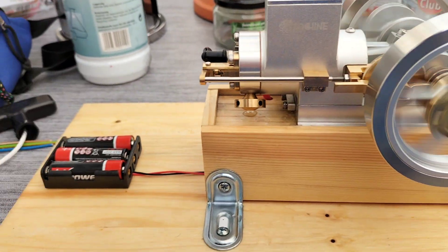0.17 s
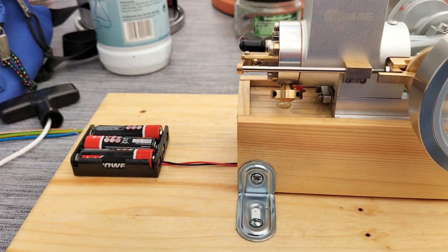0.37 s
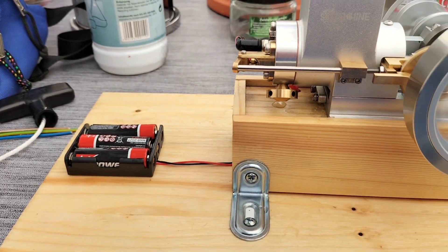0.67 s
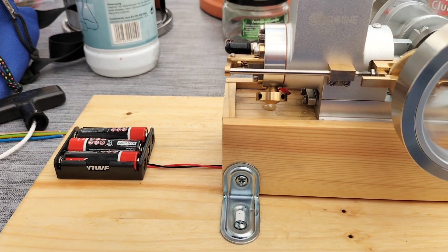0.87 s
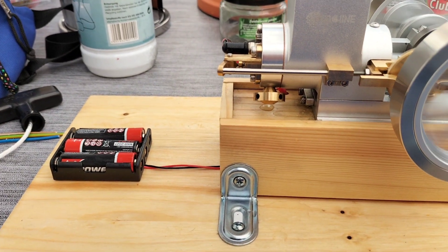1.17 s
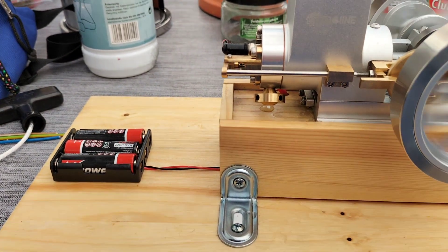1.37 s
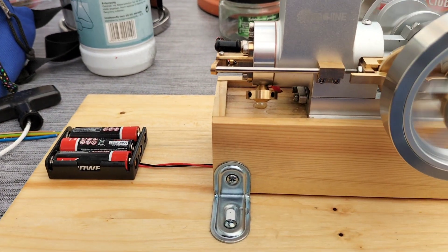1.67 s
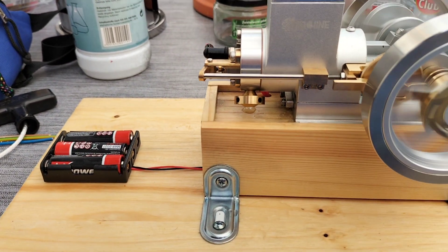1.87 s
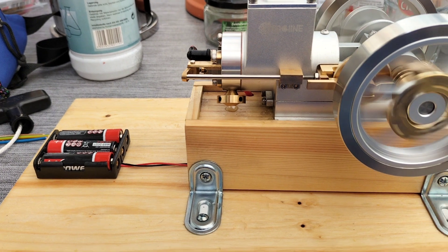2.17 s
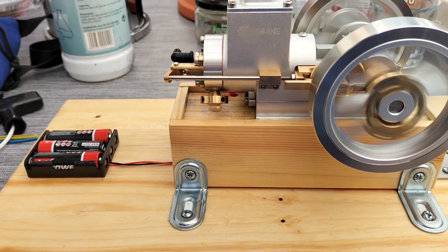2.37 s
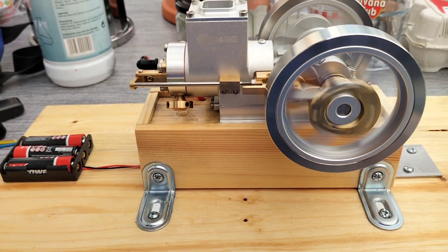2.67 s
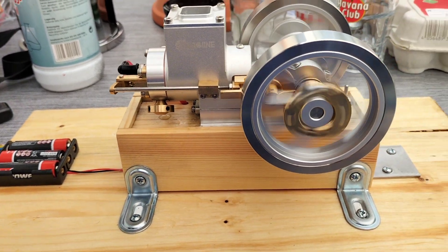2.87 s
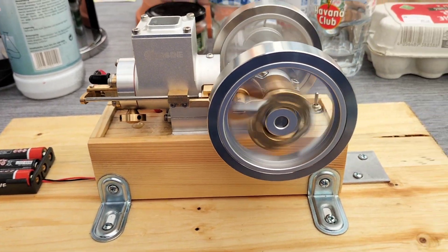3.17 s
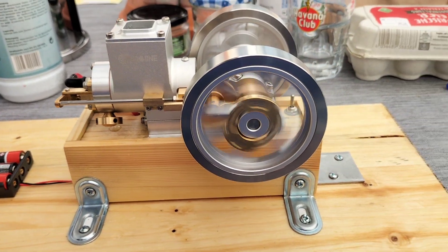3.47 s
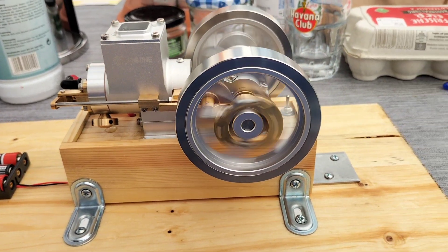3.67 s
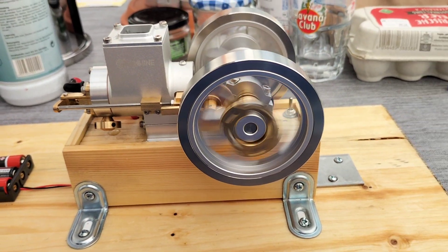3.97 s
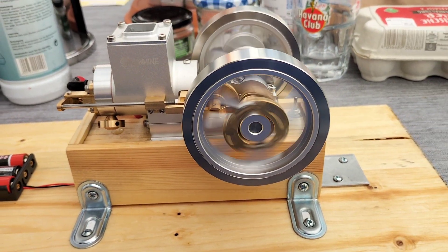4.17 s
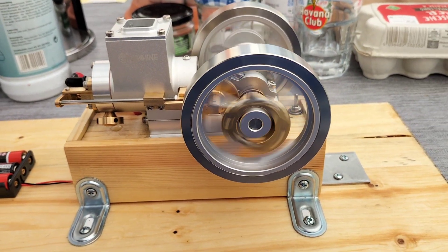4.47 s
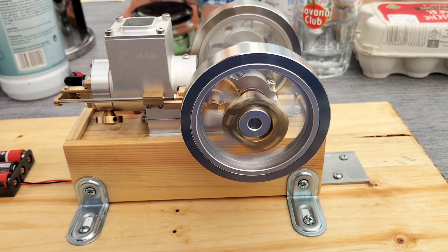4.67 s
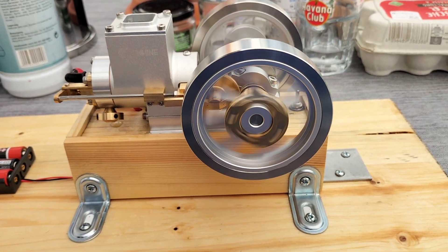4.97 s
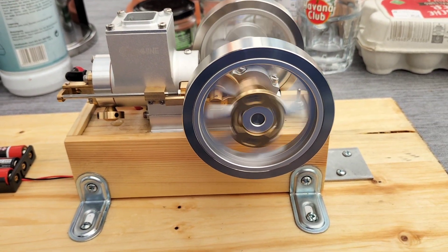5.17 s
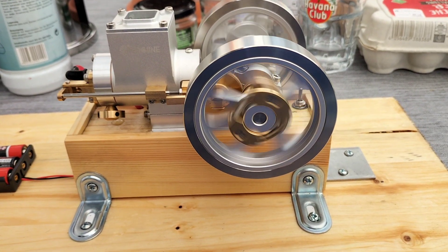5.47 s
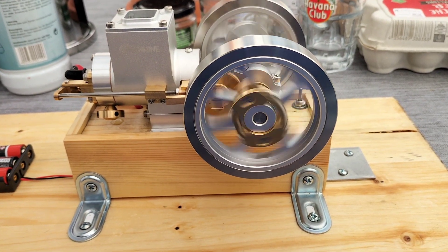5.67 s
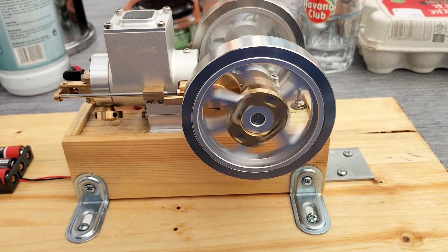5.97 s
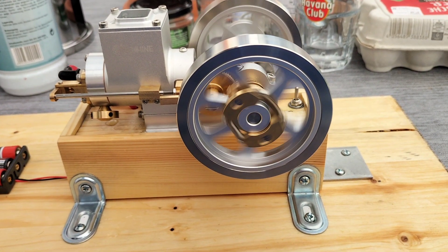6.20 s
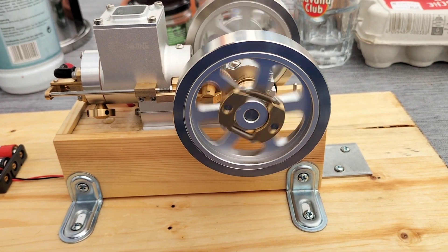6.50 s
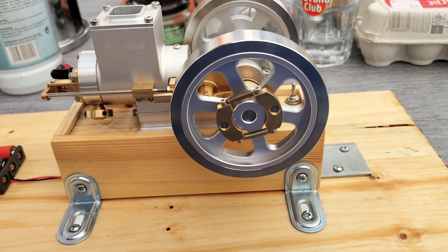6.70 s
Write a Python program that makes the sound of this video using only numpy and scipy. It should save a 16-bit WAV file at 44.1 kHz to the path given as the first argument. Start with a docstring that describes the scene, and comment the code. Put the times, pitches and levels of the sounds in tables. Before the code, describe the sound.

Close microphone, dry indoor space with barely any echo. A tabletop engine with spinning flywheels chatters quickly: bright ticks, woody-metallic knocks, gear whirr and piston hiss pulsing each turn. Loud cracking pops come at uneven gaps, momentarily pushing the mechanical noise down before it swells back. Firing then ceases and valve clacks with small rebounds slow steadily, dulling into near silence.

```python
"""Hit-and-miss engine on a wooden board

A small model engine runs close by, indoors. Each flywheel turn brings bright ticks and a few knocks (noise bursts
through resonances) over a whirr of gears and piston (grainy noise that swells with the crank angle).
Now and then it fires: a gas push, a low swing and ringing jet noise, each pop slamming a limiter down.
Then it stops firing and coasts to rest, its valve gear clacking.
"""
import sys
import numpy as np
from scipy import signal
from scipy.fft import rfft, irfft, next_fast_len
from scipy.io import wavfile
from scipy.ndimage import uniform_filter1d, minimum_filter1d

SR = 44100
rng = np.random.default_rng(int(sys.argv[2]) if len(sys.argv) > 2 else 0)


def persist_wave(psi):
    """Save psi, clipped to +-1, as 16-bit WAV."""
    counts = np.round(np.clip(psi, -1, 1) * 32767).astype(np.int16)
    wavfile.write(sys.argv[1], SR, np.atleast_2d(counts).T)


N = 301555
TIME = np.arange(N) / SR
HIT = np.arange(4096) / SR  # time line of one short sound, s
TURN_S = 0.0665  # one flywheel turn at running speed

# firings: start_s, peak_db (ahead of the limiter), then levels against the crack and two pitches:
# push_db, swing_db, swing_hz, bark_db, crack_hz
FIRINGS = [(0.1597, 19, 2.5, -1, 248, -2, 3720), (0.2962, 12.5, -6.5, -10, 380, -3.5, 2980),
           (0.9539, 26, 0, -8, 310, -5.5, 2820), (1.3522, 21, 0, -2, 297, -8, 2830),
           (1.9468, 20.5, -7.5, -7, 184, 0, 4350), (2.285, 17, -15.5, -10.5, 184, -1, 3300),
           (2.6913, 17.5, -4.5, -17, 180, 0.5, 3600), (2.9613, 14, -18, -8, 182, -5.5, 3760),
           (3.5505, 14.5, -19, -10.5, 181, -8.5, 3060), (4.1446, 27, -11, -11, 274, -1.5, 4070),
           (4.282, 18.5, -20.5, -14.5, 332, -4.5, 3400), (4.814, 9.5, -10, 0, 610, -1, 3460)]
# valve gear, once a turn while coasting: start_s, clack_db, rebound_db (both before the clack trim)
COAST_CLACKS = [(4.905, -30, -34), (4.979, -20, -21), (5.0556, -11, -11.5), (5.1329, -9, -14),
                (5.2134, -6.5, -9.5), (5.298, -9, -7.5), (5.387, -5.5, -12), (5.479, -8, -7),
                (5.5758, -15.5, -8.5), (5.6777, -14.5, -6.5), (5.7965, -9.5, -19), (5.907, -13, -8.5),
                (6.047, -12.5, -23), (6.1931, -10, -24), (6.3633, -14, -30), (6.5783, -17, -35),
                (6.818, -23.5, -44)]
# resonances of frame, flywheels and board: centre_hz, width_hz, lift_db
FRAME_MODES = [(175.4, 29, 4.5), (1090, 136, 5), (1430, 174, 3.5), (2118, 224, 4.5), (2770, 53, -3),
               (4075, 520, 9), (5090, 580, 4.5), (5724, 160, 8), (7100, 360, 6.5), (8840, 500, 8),
               (12030, 390, 14), (14200, 630, 9)]


def from_db(db):
    """Decibels to amplitude."""
    return 10 ** (np.asarray(db) / 20)


def rms_one(x):
    """Scale a sound to an RMS of 1."""
    return x / np.sqrt(np.mean(x ** 2) + 1e-20)


def colour(x, spectrum, modes=()):
    """Causal (minimum-phase) filter: a smooth spectrum lifted by resonances."""
    size = 2 * next_fast_len(x.shape[-1])
    hz = np.maximum(np.arange(size // 2 + 1) * SR / size, 1)
    points = np.array(spectrum)
    db = np.interp(np.log(hz), np.log(points[:, 0]), points[:, 1])
    # 18 dB per octave down beyond the outer points
    db -= 18 * np.abs(np.log2(hz / np.clip(hz, points[0, 0], points[-1, 0])))
    for centre_hz, width_hz, lift_db in modes:
        db += lift_db / (1 + (2 * (hz - centre_hz) / width_hz) ** 2)
    # folding the cepstrum onto positive time makes the phase minimal
    cepstrum = irfft(db * np.log(10) / 20)
    cepstrum[1:size // 2] *= 2
    cepstrum[size // 2 + 1:] = 0
    return irfft(rfft(x, size) * np.exp(rfft(cepstrum)), size)[..., :x.shape[-1]]


def drift(rate_hz):
    """Smooth chance of spread 1: low-passed noise."""
    smooth = signal.butter(2, rate_hz, fs=SR, output="sos")
    return rms_one(signal.sosfilt(smooth, rng.standard_normal(N)))


def place(times, sounds):
    """Lay short sounds on the time line."""
    out = np.zeros(N + 2 * len(HIT))
    for start_s, sound in zip(times, sounds):
        start = round(start_s * SR)
        if start >= 0:
            out[start:start + len(sound)] += sound
    return out[:N]


def turn_times():
    """Start of every flywheel turn: long runs between firings start fast and slow down; at last the wheel coasts."""
    # a run of even_turns keeps an even beat; each further turn puts its middle ahead by surge_s,
    # and a shorter run lags there instead
    even_turns, surge_s, tick_lag_s = 6.1, 0.0018, 0.001299
    fired = np.array(FIRINGS)[:, 0]
    fired = np.r_[fired[0] - 9 * TURN_S, fired]  # lead-in turns before the first pop
    starts = []
    for fired_s, next_s in zip(fired, fired[1:]):
        run_s = next_s - fired_s
        turns = round(run_s / TURN_S)
        share = np.arange(turns) / turns
        arch = 1 - (2 * share - 1) ** 2
        surge = surge_s * (turns - even_turns) * arch
        starts.extend(fired_s + run_s * share + tick_lag_s - surge)
    return np.r_[starts, fired[-1] + tick_lag_s, np.array(COAST_CLACKS)[:, 0]]


def speed_at(s):
    """Flywheel speed as a share of running speed."""
    starts = turn_times()
    middles = (starts[1:] + starts[:-1]) / 2
    return np.interp(s, middles, np.minimum(TURN_S / np.diff(starts), 1))


def each_turn(pattern, spread_db, play_s=0.0007):
    """Repeat a pattern of contacts on every turn, each a little off in time and strength: times, levels in dB."""
    starts, (share, db) = turn_times(), np.transpose(pattern)
    chance = rng.standard_normal((len(starts) - 1, 2, len(share)))
    times = starts[:-1, None] + np.diff(starts)[:, None] * share + play_s * chance[:, 0]
    levels_db = db + spread_db * chance[:, 1]
    heard = starts[:-1] > -TURN_S
    return times[heard].ravel(), levels_db[heard].ravel()


def contacts(times, level_db, spectrum, modes, strike_db, contact_s, tail_db, tail_s):
    """Metal parts meet in one firm strike and a brief chatter, then rattle on; level_db is the RMS of the first 4 ms."""
    chatter = np.exp(-(HIT / contact_s) ** 2)
    rattle = from_db(tail_db) * np.exp(-HIT / tail_s)
    force = rng.standard_normal((len(times), len(HIT))) * (chatter + rattle)
    force[:, int(contact_s * SR / 2)] += from_db(strike_db) * np.sqrt(contact_s * SR)
    hits = colour(force, spectrum, modes)
    head = np.sqrt(np.mean(hits[:, HIT < 0.004] ** 2, axis=1))
    return place(times, hits * (from_db(level_db) / head)[:, None])


def rubbing(level_db, spectrum, grain_db, grain_hz):
    """Surfaces catch and let go in small grains that shake the frame."""
    grains = rng.standard_normal(N) * from_db(grain_db * drift(grain_hz))
    return from_db(level_db) * rms_one(colour(grains, spectrum, FRAME_MODES))


def through_board(x, slow_hz=950, width_hz=800, count=3):
    """Bending waves in the board: all-passes hold back the band around slow_hz, so a knock's highs come first."""
    r = np.exp(-np.pi * width_hz / SR)
    a = np.array([1, -2 * r * np.cos(2 * np.pi * slow_hz / SR), r * r])
    return signal.sosfilt([np.r_[a[::-1], a]] * count, x + 1e-18)


def soften(x, edge_hz=10000, power=0.79):
    """As the flywheel slows, its contacts grow softer and lose their top."""
    low_pass = signal.butter(6, edge_hz, fs=SR, output="sos")
    dull = signal.sosfiltfilt(low_pass, x)
    return dull + speed_at(TIME) ** power * (x - dull)


def still_air(level_db=-63):
    """The still room: a steady bed of dark noise."""
    # spectrum: pitch_hz, relative_db (per Hz)
    air_colour = [(100, -2), (1000, -10), (5000, -24), (16000, -36)]
    return from_db(level_db) * rms_one(colour(rng.standard_normal(N), air_colour))


def room(x, t60_s=0.12):
    """A faint, dull tail from the furnished room: convolution with decaying noise."""
    t = TIME[:SR // 2]
    tail = rng.standard_normal(len(t)) * from_db(-60 * t / t60_s) * (t > 0.004)
    tail = colour(tail, [(110, 0.5), (1500, -9), (15000, -5.5)])
    return signal.fftconvolve(x, tail / np.sqrt(np.sum(tail ** 2)))[:N]


def whirr(rumble_trim_db=-1, grind_trim_db=-4, hiss_trim_db=-5, compression_db=10, compression_s=0.049):
    """Board, gears and piston swell and fade with the crank angle; the board rumbles harder just before a firing."""
    # sliding and meshing parts, before swells and trims: start_s, rumble_db (board), grind_db (gears), hiss_db (piston)
    run_levels = [(0, -38.5, -26, -37), (0.7, -37, -21.5, -34), (2.3, -39.5, -25.5, -35),
                  (4, -37.5, -24.5, -32), (4.5, -40.5, -26.5, -33.5), (5, -35.5, -26, -35.5),
                  (5.6, -39, -26.5, -38.5), (6.1, -40, -29, -44), (6.4, -45.5, -35.5, -49),
                  (6.66, -44.5, -37.5, -59), (6.73, -58, -57, -63), (6.84, -59, -54, -73)]
    # swells of rubbing within each turn: share_of_turn, width_turns, rumble_db, grind_db, hiss_db
    stroke_loads = [(.01, 0.071, 4, 8, 7), (.18, 0.046, 2.5, 3, 9.5), (.26, 0.045, -3, 6, 1.5),
                    (.48, 0.056, 3.5, 5, -1), (.67, 0.03, 1.5, -3.5, 7), (0.759, 0.052, -6.5, 7, 2)]
    # spectra of the rubbing parts: pitch_hz, relative_db (per Hz)
    rumble_colour = [(20, -24), (65, -20.5), (120, -2.5), (220, 0), (450, -6), (1000, -17)]
    grind_colour = [(350, -31), (750, -0.5), (1150, -0.5), (1700, -7.5), (2400, -8.5), (4000, -25.5)]
    hiss_colour = [(1800, -8.5), (3200, -4), (6000, -1.5), (9000, -12), (10800, -22), (16000, -21)]
    starts, fired = turn_times(), np.array(FIRINGS)[:, 0]
    angle_turns = np.interp(TIME, starts, np.arange(len(starts)))
    run = np.transpose(run_levels)
    levels_db = np.array([np.interp(TIME, run[0], level) for level in run[1:]])
    for share, width, *load_db in stroke_loads:
        from_centre = (angle_turns - share + 0.5) % 1 - 0.5
        levels_db += np.outer(load_db, np.exp(-(from_centre / width) ** 2))
    until_firing = np.r_[fired, np.inf][np.searchsorted(fired, TIME)] - TIME
    rumble_db, grind_db, hiss_db = levels_db
    rumble_db = rumble_db + compression_db * np.exp(-until_firing / compression_s)
    return (rubbing(rumble_db + rumble_trim_db, rumble_colour, grain_db=2.0, grain_hz=123)
            + rubbing(grind_db + grind_trim_db, grind_colour, grain_db=3.5, grain_hz=250)
            + rubbing(hiss_db + hiss_trim_db, hiss_colour, grain_db=4.5, grain_hz=425))


def ticks(trim_db=1):
    """Cam and governor tick brightly on every turn."""
    # ticks within a turn: share_of_turn, relative_db
    turn_ticks = [(0.002, -0.5), (.16, -8.5), (.64, -11.5)]
    # strength of the ticking, before the trim: start_s, level_db
    ticking = [(0, -26.5), (.6, -24), (1.6, -25.5), (2.8, -30), (3.2, -25), (4.1, -33), (4.8, -34),
               (5.3, -25), (5.9, -39.5), (6.4, -53), (6.84, -47)]
    # spectrum of a tick: pitch_hz, relative_db (per Hz)
    tick_colour = [(500, -15), (2000, 10.5), (4500, -3), (7500, 1), (10500, -6), (16000, -10)]
    times, db = each_turn(turn_ticks, spread_db=2.6)
    db = db + np.interp(times, *np.transpose(ticking)) + trim_db
    return contacts(times, db, tick_colour, FRAME_MODES,
                    strike_db=-13, contact_s=0.0016, tail_db=-9.5, tail_s=0.012)


def knocks(trim_db=-5, slowing_db=14, loose_speed=0.85, calm_db=-13):
    """Rod and bearings take up their play each turn, calming as the wheel slows; a few single knocks join them."""
    # play taken up at the same crank angles each turn, before calming and trim: share_of_turn, level_db
    turn_knocks = [(0.004, -14.5), (.21, -15), (.43, -23), (.72, -16.5), (.92, -17)]
    # single knocks, hard and faint: two early valve-gear clacks, then mid-turn contacts and a faint tick
    # while coasting, before the trim: start_s, level_db
    single_knocks = [(0.0885, -10.5), (0.1105, -12.5), (6.078, -24.5), (6.297, -16), (6.4917, -17.5),
                     (6.638, -29.5), (6.6836, -30), (6.7415, -38)]
    # spectrum of a knock: pitch_hz, relative_db (per Hz)
    knock_colour = [(60, -53), (200, -18), (500, -23.5), (850, -2.5), (1250, -0.5), (2300, -5.5),
                    (3300, -20), (7000, -30.5), (10500, -42), (16000, -66)]
    times, db = each_turn(turn_knocks, spread_db=2.5)
    slowing = 1 - speed_at(times)
    # calm_db is reached in full at loose_speed, a share of running speed
    calm = np.clip(slowing / (1 - loose_speed), 0, 1)
    db = db + calm_db * calm - slowing_db * slowing ** 2
    regular = contacts(times, db + trim_db, knock_colour, FRAME_MODES,
                       strike_db=-2.0, contact_s=0.00269, tail_db=-6.5, tail_s=0.0078)
    single_s, single_db = np.transpose(single_knocks)
    single = contacts(single_s, single_db + trim_db, knock_colour, FRAME_MODES,
                      strike_db=-3.5, contact_s=0.00219, tail_db=-4, tail_s=0.01)
    return through_board(regular) + single


def clacks(trim_db=-3, rebound_turns=0.072):
    """While coasting, the valve gear clacks once a turn and rebounds a fixed crank angle later."""
    # resonances of the valve gear: centre_hz, width_hz, lift_db
    valve_modes = [(995, 140, 7), (1981, 240, 14), (8610, 1400, 12)]
    # spectrum of a clack: pitch_hz, relative_db (per Hz)
    clack_colour = [(60, -38), (180, -1), (550, -15), (1000, 2), (1500, -6), (2200, -1), (3200, -19.5),
                    (7000, -24.5), (11000, -40.5), (16000, -54)]
    times, first_db, rebound_db = np.transpose(COAST_CLACKS)
    rebound_s = times + rebound_turns * np.gradient(times)
    return contacts(np.r_[times, rebound_s], np.r_[first_db, rebound_db] + trim_db,
                    clack_colour, FRAME_MODES + valve_modes,
                    strike_db=2.0, contact_s=0.002, tail_db=-15, tail_s=0.0093)


def pops(burn_s=0.0042, rise_s=0.0008, push_s=0.00022, suck_s=0.0013, suck_width_s=0.00062,
         swing_s=0.0054, crack_width_hz=1100, crack_lift_db=10):
    """Each firing: a push of gas and its rebound, a low swing, and a few milliseconds of ringing jet noise."""
    # spectrum of the crack: pitch_hz, relative_db (per Hz)
    crack_colour = [(400, -31), (2500, 3.5), (5000, 5), (7000, -5), (10000, -27.5), (12500, -10),
                    (16000, -19)]
    burn = np.exp(-(HIT / burn_s) ** 4) * (1 - np.exp(-HIT / rise_s))
    outward = np.exp(-((HIT - push_s) / push_s) ** 2)
    inward = np.exp(-((HIT - suck_s) / suck_width_s) ** 2)
    push = rms_one(outward - inward)
    swing_fade = np.exp(-(HIT / swing_s) ** 2)
    sounds = []
    for _, peak_db, push_db, swing_db, swing_hz, bark_db, crack_hz in FIRINGS:
        swing = rms_one(-np.sin(2 * np.pi * swing_hz * (HIT - push_s)) * swing_fade)
        jet = rng.standard_normal((2, len(HIT))) * burn
        crack = rms_one(colour(jet[0], crack_colour, [(crack_hz, crack_width_hz, crack_lift_db)]))
        bark = rms_one(colour(jet[1], [(550, -0.5), (1900, 0.2)]))
        pop = crack + from_db(bark_db) * bark + from_db(push_db) * push + from_db(swing_db) * swing
        sounds.append(from_db(peak_db) * pop / np.abs(pop).max())
    return place(np.array(FIRINGS)[:, 0], sounds)


def scene(mechanism_room_db=-14.5, pop_room_db=-29):
    """The engine close by, in a quiet furnished room."""
    mechanism = soften(whirr() + ticks() + knocks() + clacks())
    firing = pops()
    tail = room(from_db(mechanism_room_db) * mechanism + from_db(pop_room_db) * firing)
    return (still_air() + tail + mechanism + firing)[None]


def record(dry, ceiling=0.58, release_s=0.46, attack_s=0.001, low_cut_hz=60, cutoff_hz=16100):
    """A look-ahead limiter ducks at each pop and creeps back up; deep bass and the top are cut."""
    needed = np.maximum(1 - ceiling / np.maximum(np.abs(dry[0]), 1e-9), 1e-9)
    # the deepest cut so far, fading exponentially
    held = np.exp(np.maximum.accumulate(np.log(needed) + TIME / release_s) - TIME / release_s)
    size = 2 * int(attack_s * SR / 2) + 1
    gain = np.exp(uniform_filter1d(minimum_filter1d(np.log(1 - held), size), size))
    low_cut = signal.butter(1, low_cut_hz, "high", fs=SR, output="sos")
    lean = signal.sosfilt(low_cut, dry * gain)
    top_cut = signal.ellip(10, 0.1, 80, cutoff_hz, fs=SR, output="sos")
    return signal.sosfilt(top_cut, lean)


dry = scene()
out = record(dry)
persist_wave(out)
```